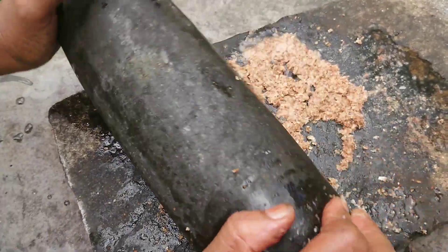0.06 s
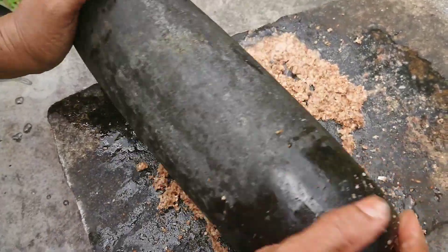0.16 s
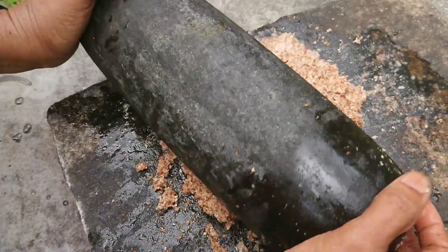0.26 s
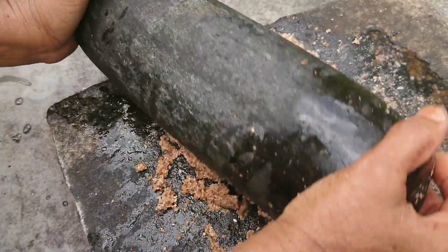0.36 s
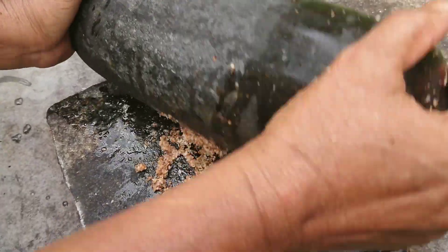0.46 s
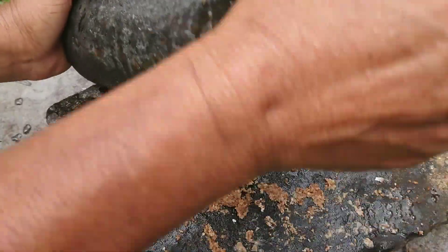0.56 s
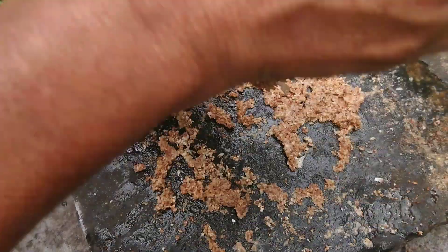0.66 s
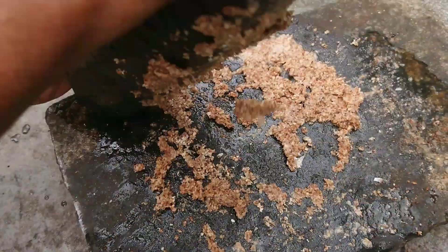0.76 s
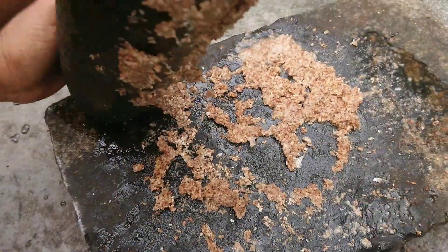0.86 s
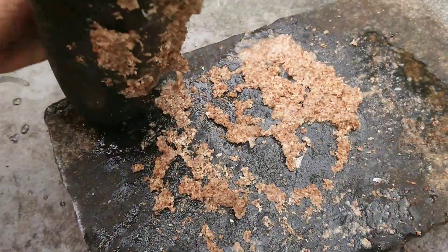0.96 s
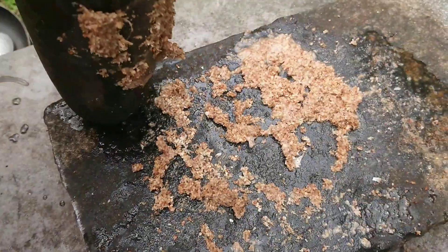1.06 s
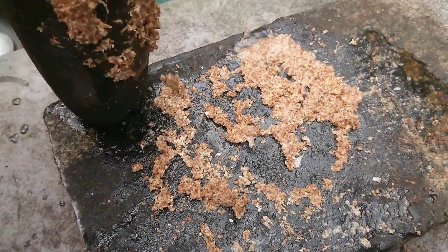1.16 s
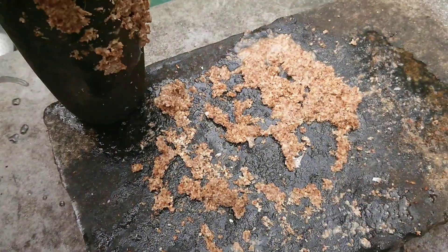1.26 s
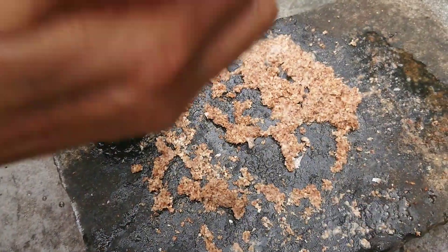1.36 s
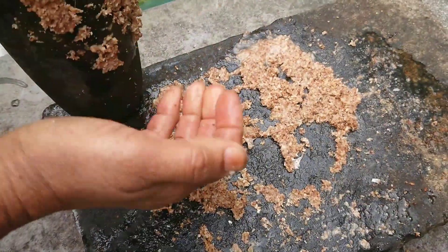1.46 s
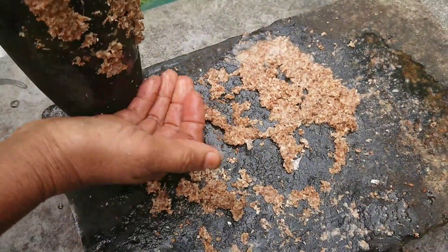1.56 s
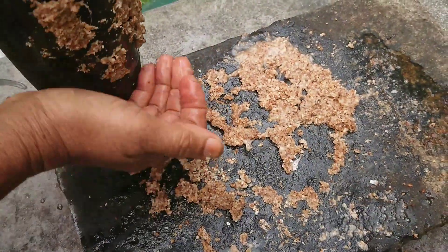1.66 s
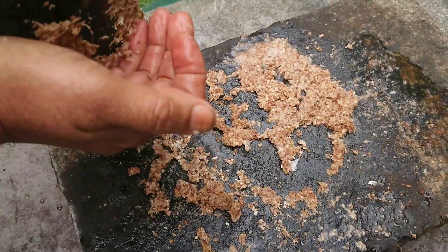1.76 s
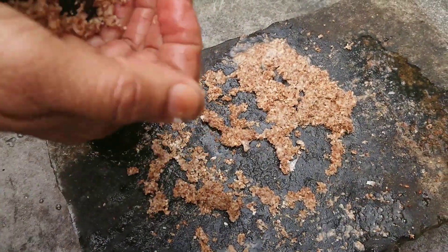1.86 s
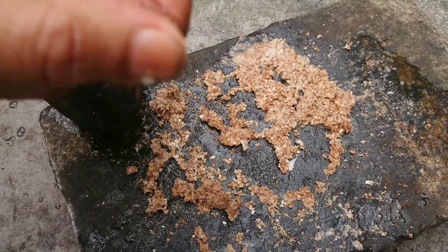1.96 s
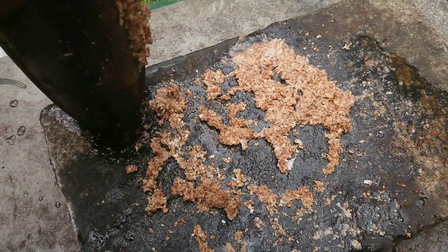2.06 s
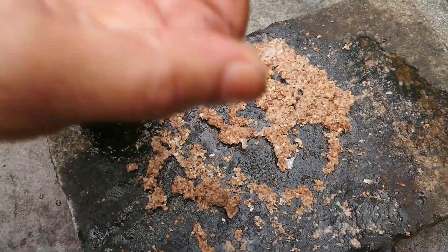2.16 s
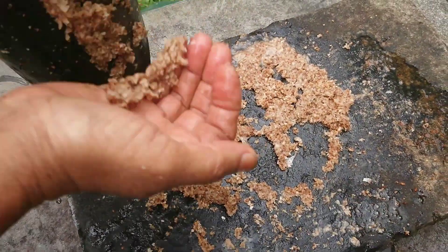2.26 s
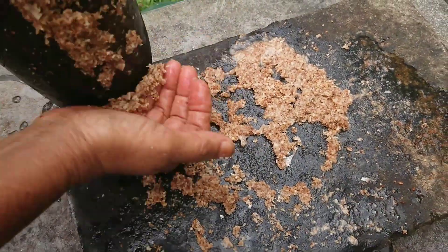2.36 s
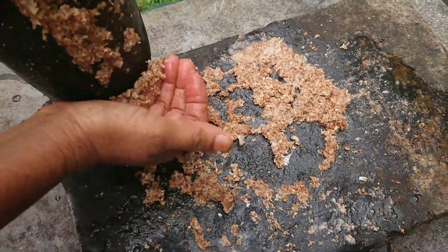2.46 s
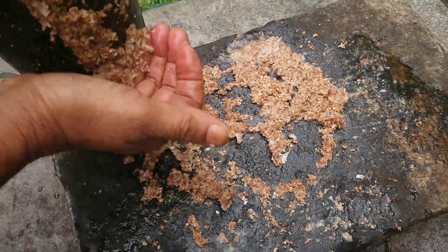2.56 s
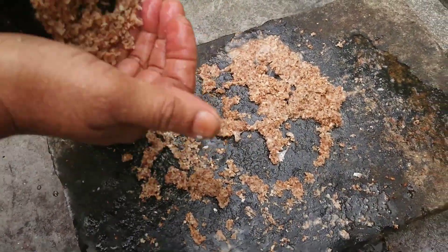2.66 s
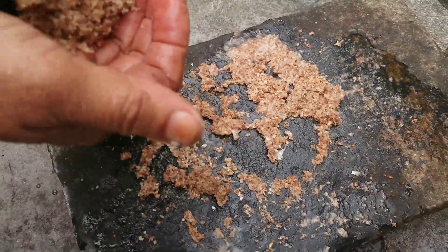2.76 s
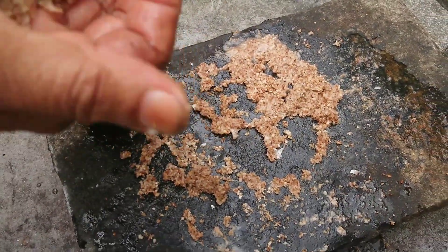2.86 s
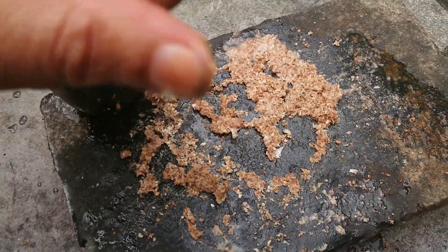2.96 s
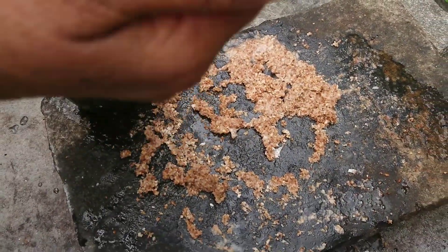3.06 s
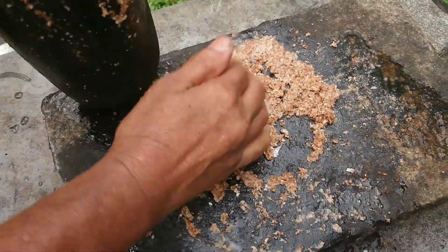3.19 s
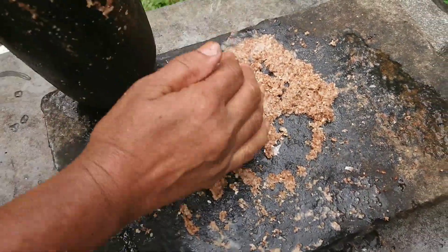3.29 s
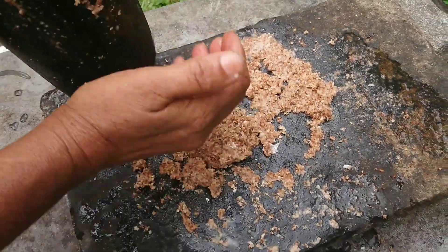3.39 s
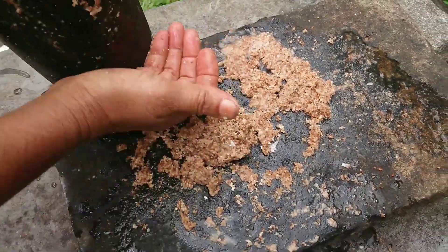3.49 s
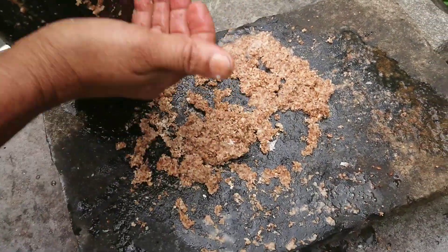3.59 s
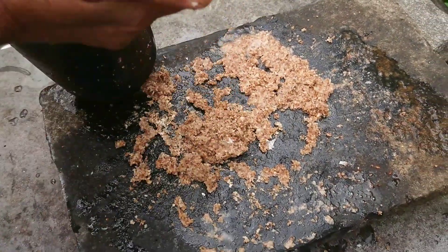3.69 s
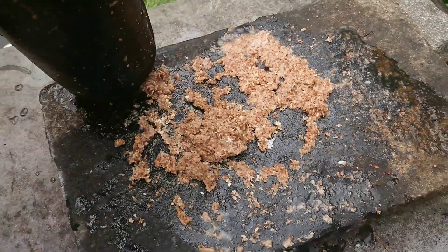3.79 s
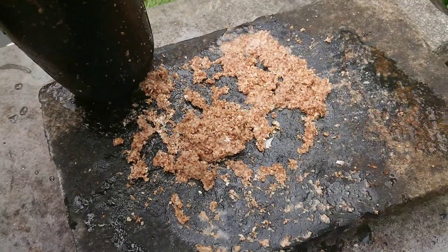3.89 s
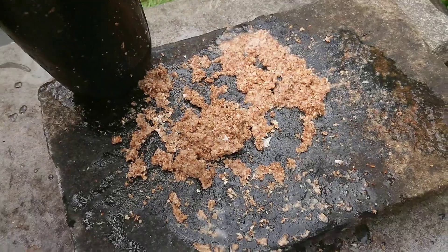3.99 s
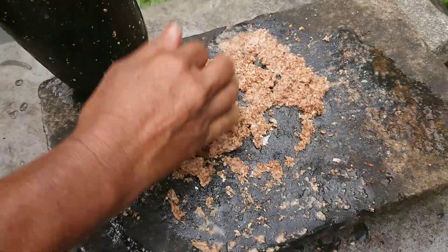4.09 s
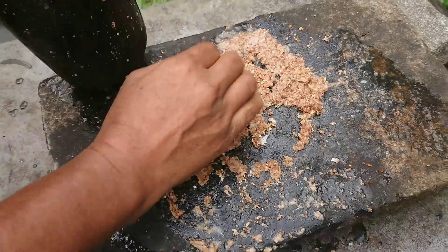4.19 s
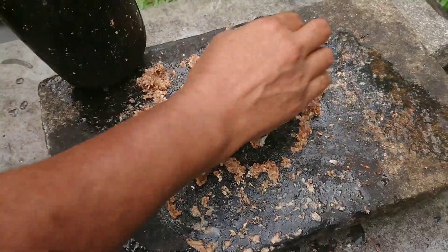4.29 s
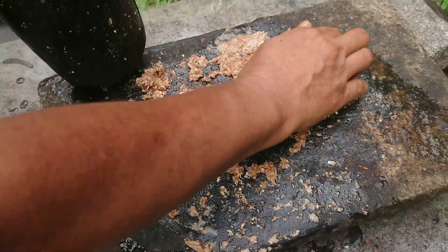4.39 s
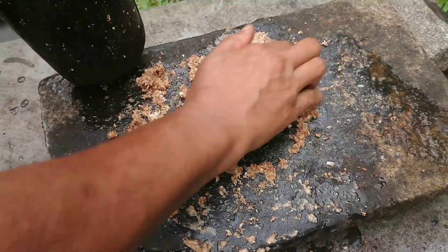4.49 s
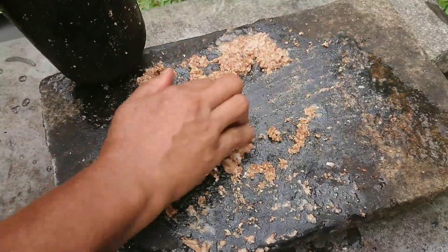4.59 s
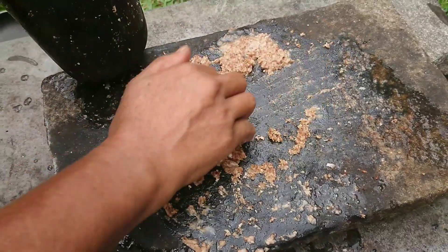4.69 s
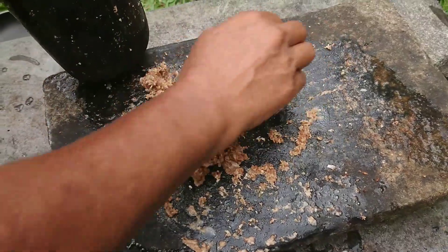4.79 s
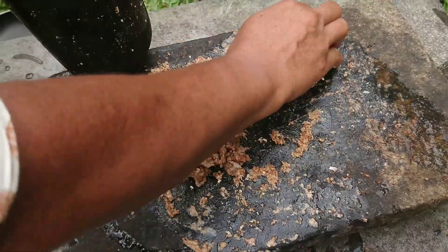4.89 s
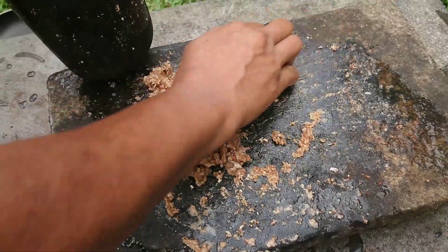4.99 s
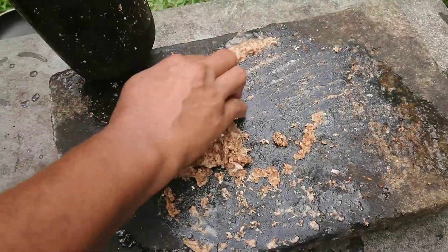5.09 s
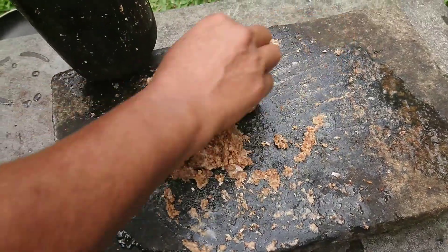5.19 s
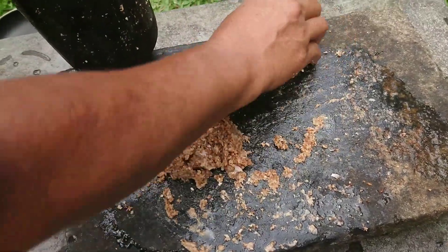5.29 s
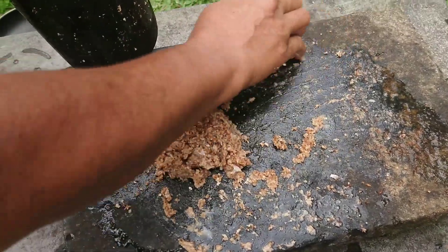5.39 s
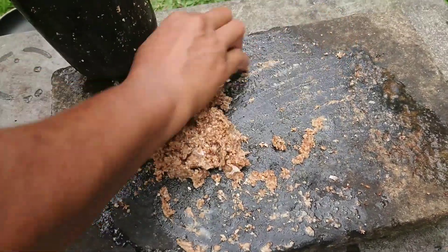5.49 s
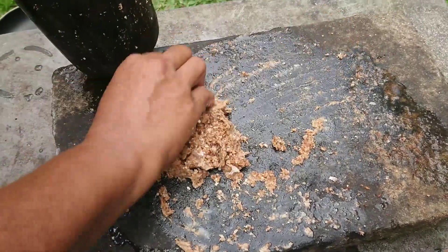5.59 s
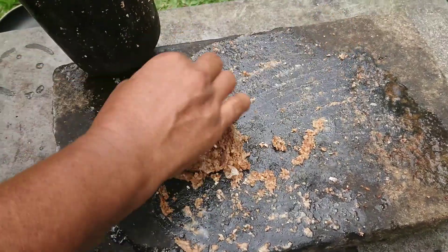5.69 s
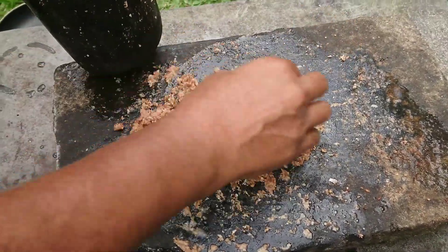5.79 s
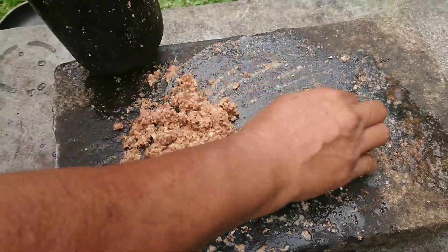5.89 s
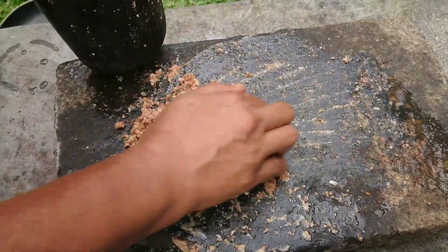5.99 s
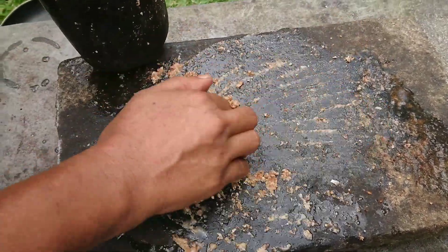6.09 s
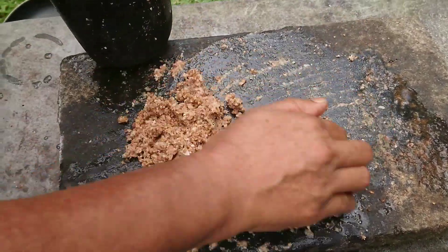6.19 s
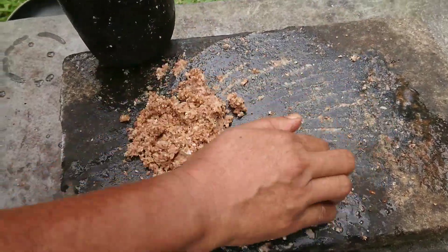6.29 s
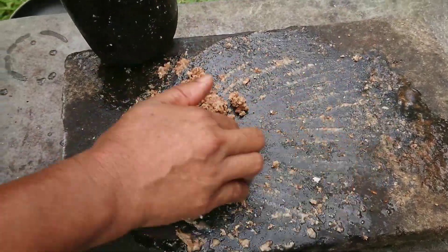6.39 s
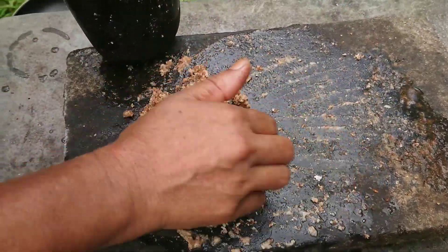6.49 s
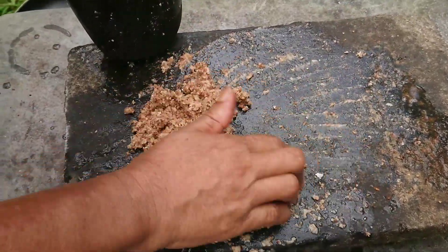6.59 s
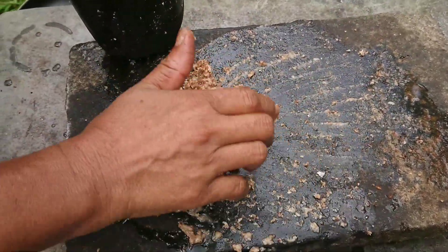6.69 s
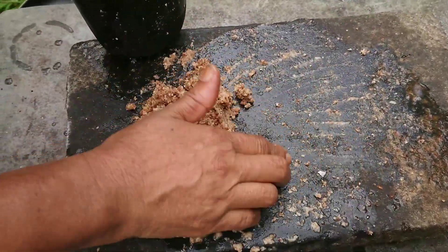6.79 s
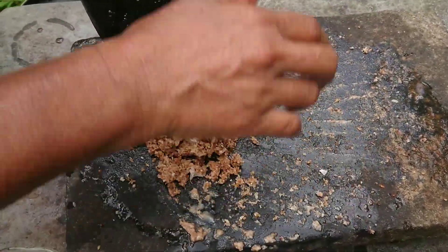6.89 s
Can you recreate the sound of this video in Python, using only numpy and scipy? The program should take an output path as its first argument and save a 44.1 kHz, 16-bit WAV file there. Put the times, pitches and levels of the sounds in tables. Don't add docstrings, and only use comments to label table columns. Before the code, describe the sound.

Outdoors, close to a wet stone slab, a stone roller turns on grit with a faint ring, knocks once, then is stood on end with a hard clack and quick bounces. A hand wipes wet grain off it in soft hisses and squelches, then sweeps the slab with raspier strokes. Low wind thumps buffet the microphone, stronger on the left, over a faint cicada chorus and a few far birds.

```python
import sys
import numpy as np
from scipy import signal
from scipy.fft import rfft, irfft, next_fast_len
from scipy.io import wavfile
from scipy.ndimage import uniform_filter1d

SR = 44100
rng = np.random.default_rng(int(sys.argv[2]) if len(sys.argv) > 2 else 0)


def to_linear_factor(level_db):
    exponent = np.asarray(level_db, float) / 20
    return 10 ** exponent


def store_pcm(level_fs):
    pcm = np.round(np.clip(level_fs, -1, 1) * 32767).astype(np.int16)
    wavfile.write(sys.argv[1], SR, np.atleast_2d(pcm).T)


N = 306435

# frequency in Hz, level in dB, 60 dB decay time in s.
ROLLER_MODES = [(3140, -24.5, 0.044), (4969, -24, 0.054), (5900, -27, .015)]


def noise():
    return rng.standard_normal(N)


def level(x, db):
    return x * to_linear_factor(db) / np.sqrt(np.mean(x ** 2))


def colour(x, points):
    hz, db = np.transpose(points)
    size = next_fast_len(N, real=True)
    f = np.arange(size // 2 + 1) * SR / size + 1
    gain = to_linear_factor(np.interp(np.log(f), np.log(hz), db))
    return irfft(rfft(x, size) * gain, size)[:N]


def band(x, hz, width):
    b, a = signal.iirpeak(hz, hz / width, fs=SR)
    return signal.lfilter(b, a, signal.lfilter(b, a, x))


def ring(x, modes):
    out = 0
    for hz, db, t60 in modes:
        pole = np.exp(2j * np.pi * hz / SR - np.log(1000) / (t60 * SR))
        out = out + to_linear_factor(db) * signal.lfilter([1], [1, -pole], x).imag
    return out


def walk(rate):
    k = int(SR / rate)
    steps = np.repeat(rng.standard_normal(N // k + 1), k)
    return 1.54 * uniform_filter1d(uniform_filter1d(steps, k), k)[:N]


def grit(spread_db):
    return noise() * to_linear_factor(spread_db * np.minimum(rng.exponential(size=N), 5))


def moving(x, hz, width):
    lowpass = signal.butter(2, width / 2, fs=SR, output="sos")
    slow = signal.sosfilt(lowpass, x * np.exp(2j * np.pi * rng.random(N)))
    carrier = np.exp(2j * np.pi * np.cumsum(hz) / SR)
    return level((slow * carrier).real, 0)


def spell(start, length, attack, release):
    t = np.arange(N) / SR - start
    attack, release = min(attack, length / 2), min(release, length / 2)
    gain = np.clip(np.minimum(t / attack, (length - t) / release), 0, 1)
    return np.sin(gain * np.pi / 2) ** 2, np.clip(t / length, 0, 1)


def add(out, s, x):
    i = int(s * SR)
    x = x[max(-i, 0):N - i]
    out[max(i, 0):max(i, 0) + len(x)] += x


def ports(x, left_db):
    lead = 11
    return np.array([x[0] * to_linear_factor(left_db / 2), np.roll(x[1], lead) * to_linear_factor(-left_db / 2)])


def air():
    # frequency in Hz, level in dB per Hz.
    air_tone = [(20, -54), (40, -10.5), (64, 2), (110, -8), (200, -16), (310, -23), (800, -23),
                (1600, -26.5), (3000, -26), (4500, -29), (5800, -33), (8500, -34), (10300, -32),
                (11500, -42.5), (15900, -69)]
    shared = colour(noise(), [(300, 2), (1200, -14)])
    own = [colour(noise(), [(60, -6.5), (250, -3.0), (1000, -2)]) for _ in range(2)]
    out = np.array([colour((shared + x) * to_linear_factor(1.0 * walk(2.916)), air_tone) for x in own])
    left_right_db = np.array([[1.5], [-1.5]])
    return level(out, -51) * to_linear_factor(left_right_db)


def birds():
    # start in seconds, length in seconds, start Hz, end Hz, level in dB, overtone in dB at 3/2.
    bird_notes = [
        (0.249, 0.064, 2000, 1984, -65, -40),
        (.66, 0.077, 1550, 1540, -71.5, -34),
        (1.124, 0.082, 1420, 1400, -67, -40),
        (6.105, 0.15, 1160, 1160, -63.5, -30),
        (6.41, 0.131, 1350, 1488, -74, -32),
        (6.631, 0.092, 1335, 1286, -61.5, -34),
        (6.663, .16, 1217, 1184, -57.5, -15),
    ]
    out, waver, hoarse = np.zeros(N), walk(50), to_linear_factor(2.0 * walk(90))
    for s, length, hz0, hz1, db, over_db in bird_notes:
        u = np.linspace(0, 1, int(length * SR))
        hz = hz0 + (hz1 - hz0) * u + 8 * waver[int(s * SR):][:len(u)]
        phase = 2 * np.pi * np.cumsum(hz) / SR
        whistle = np.sin(phase) + to_linear_factor(over_db) * np.sin(3 * phase / 2)
        add(out, s, to_linear_factor(db) * np.sin(np.pi * u) ** .5 * whistle)
    t = np.arange(8000) / SR
    trees = [to_linear_factor(-36) * rng.standard_normal(len(t)) * np.exp(-t / 0.059) for _ in range(2)]
    return np.array([out * hoarse + signal.fftconvolve(out, tail)[:N] for tail in trees])


def cicadas():
    chorus_hz = (7140, 7060)
    # frequency in Hz, level in dB.
    chorus_overtones = [(12700, -85), (14500, -86)]
    # time in seconds, pitch in Hz, level in dB.
    near_cicada = [
        (3.74, 3150, -82),
        (3.79, 3080, -67.5),
        (4.599, 3026, -66),
        (5.3, 2907, -66.5),
        (6.05, 2780, -67.5),
        (6.3, 2800, -78),
    ]
    chorus = []
    for hz in chorus_hz:
        blur = level(band(band(grit(.8), hz, 1960), hz, 1960), -56) * to_linear_factor(1.02 * walk(3.37))
        chorus.append(blur + sum(level(band(noise(), top_hz, 800), db) for top_hz, db in chorus_overtones))
    s, hz, db = np.transpose(near_cicada)
    t = np.arange(N) / SR
    loud = to_linear_factor(np.interp(t, s, db, left=-120, right=-120) + 1.2 * walk(20))
    near = [loud * moving(grit(2.09), np.interp(t, s, hz), 300) for _ in range(2)]
    return np.array(chorus) + near


def shed(offset_db):
    # time in seconds, peak level in dB.
    breeze = [(0, -37), (.5, -34.5), (.68, -31), (.85, -48), (1.6, -48), (1.8, -40), (2.1, -29.5),
              (2.25, -51), (2.6, -34), (2.78, -44), (3.1, -39.5), (3.3, -33.5), (3.65, -29), (3.82, -34.5),
              (3.9, -50), (5.75, -57), (5.9, -41), (6.4, -48)]
    gap_s, scatter_db = .036, 3
    chance = rng.standard_normal((int(N / SR / gap_s), 4)).T
    s = np.clip((np.arange(chance.shape[1]) + .5 + 0.248 * chance[0]) * gap_s, 0, None)
    db = np.interp(s, *np.transpose(breeze)) + offset_db + scatter_db * chance[1]
    swing_hz = 76.5 * np.exp(.15 * chance[2])
    length_ms = 15 * np.exp(0.47 * chance[3])
    return list(zip(s, db, swing_hz, length_ms))


def wind():
    # time in seconds, peak in dB, swing in Hz, length in ms.
    left_eddies = [(0.005, -13, 117, 3.3), (0.056, -22.5, 71.5, 10), (0.12, -26, 145, 2.4),
                   (0.24, -25.5, 111, 3.9), (0.266, -20.5, 80, 4.2), (0.308, -19.5, 72, 49),
                   (0.362, -9.5, 77.6, 8.8), (0.754, -23, 72.6, 11), (0.94, -20, 75, 29),
                   (0.984, -14.5, 133, 20.6), (1.072, -29.5, 60.6, 48), (1.182, -26.5, 73, 15),
                   (1.311, -28.5, 101.5, 6.9), (1.681, -19, 98.6, 14), (1.709, -22.5, 77, 15),
                   (1.74, -25.5, 104, 16), (1.766, -18.5, 79.5, 4.8), (1.896, -31, 82.5, 24),
                   (1.969, -13, 109, 6.7), (2.36, -32, 82, 26), (2.888, -26, 82.6, 13.3),
                   (2.912, -26, 80, 11.6), (3.449, -16, 91, 17), (3.517, -27.5, 117, 9.9),
                   (3.554, -25, 89.6, 11), (3.585, -22.5, 102, 13.5), (3.742, -25.5, 100.3, 15),
                   (6.116, -29, 74, 15), (6.159, -30, 65.7, 16), (6.23, -26, 92, 9.7)]
    right_eddies = [
        (0.124, -36, 137, 2),
        (0.283, -23, 91, 3),
        (0.408, -32, 115, 14),
        (0.528, -29.5, 154, 13),
        (2.541, -35, 59, 31),
        (2.598, -30, 69, 23),
        (3.073, -29.5, 73, 2),
        (3.138, -38, 69, 29),
        (3.189, -37, 66, 13),
    ]
    out = np.zeros((2, N))
    lee_db = -20
    for port, eddies in zip(out, (left_eddies + shed(0), right_eddies + shed(lee_db))):
        for (s, db, hz, ms), turns in zip(eddies, rng.random((len(eddies), 3))):
            sigma = max(ms / 1000, .5 / hz) / 2.16
            t = np.arange(-6 * sigma, 6 * sigma, 1 / SR)
            # pitch ratio, width in s, level in dB
            parts = ((.65, 2.1 * sigma, -5), (1.1, 0.82 * sigma, -3), (2.4, .0022, -14))
            for (ratio, width, part_db), turn in zip(parts, turns):
                swing = np.exp(-.5 * (t / width) ** 2) * np.cos(2 * np.pi * (ratio * hz * t + turn))
                add(port, s + t[0], to_linear_factor(db + part_db) * swing)
    return signal.sosfilt(signal.butter(4, 42, "high", fs=SR, output="sos"), out)


def taps():
    # time in seconds, level in dB, frequency in Hz, length in ms.
    fingertips = [
        (2.04, -48, 470, 3.5),
        (4.09, -47, 215, 9),
        (6.62, -53, 750, 2.2),
        (6.8272, -38, 770, 0.95),
        (6.8303, -30, 1750, .4),
        (6.8332, -39.5, 583, 1.66),
    ]
    out = np.zeros(N)
    for s, db, hz, ms in fingertips:
        t = np.arange(-ms / 250, ms / 250, 1 / SR)
        add(out, s + t[0], to_linear_factor(db) * np.exp(-.5 * (1000 * t / ms) ** 2) * np.sin(2 * np.pi * hz * t))
    return ports([out, out], 2.3)


def strokes():
    # start in seconds, length in seconds, rub level in dB,
    # cupped palm in dB above it, swell over the stroke in dB.
    wipes = [
        (.06, 0.091, -56.5, 7, .1),
        (.16, .13, -63.5, -8, .1),
        (.96, .09, -64, -15, .1),
        (1.23, 0.29, -72, -2.5, .1),
        (1.69, .38, -58.5, -.5, -2.5),
        (2.53, .46, -64, 1.5, 6.5),
        (3.56, .33, -63, 1.5, -4),
    ]
    sweeps = [
        (4.47, 0.28, -63, 6, .1),
        (4.98, .23, -69.5, 13, .1),
        (5.42, .3, -72, 16, 5),
        (5.98, .14, -63, -9, -2.5),
        (6.3, 0.21, -71, 10.5, 2.5),
    ]
    # attack in s, release in s, palm in Hz, palm change in dB, palm glide ratio,
    # rasp in dB at start and at end, rasp in Hz.
    wipe_rule = (0.03, 0.12, 1470, -8.5, 1.4, -6, 12.5, 4550)
    sweep_rule = (2, 0.7, 1780, -10.5, 1.1, 13, 6.5, 2900)
    crumble_db, crumble_s = -12.5, .16
    rub, shape = np.zeros(N), np.ones((4, N))
    for table, rule in ((wipes, wipe_rule), (sweeps, sweep_rule)):
        attack, release, palm_hz, open_db, glide, rasp0_db, rasp1_db, rasp_hz = rule
        for start, length, db, palm_db, swell_db in table:
            gain, u = spell(start, length, attack, release)
            slip, _ = spell(start + length / 2, length / 2 + crumble_s, attack, crumble_s)
            rub = rub + to_linear_factor(db + swell_db * u) * np.maximum(gain, to_linear_factor(crumble_db) * slip)
            rasp_db = (rasp0_db + (rasp1_db - rasp0_db) * u) * (gain > 0)
            now = [palm_db + open_db * u, palm_hz * glide ** u, rasp_db, rasp_hz + 0 * u]
            shape = np.where(gain + slip > 0, now, shape)
    return rub, shape


def hand():
    # frequency in Hz, level in dB per Hz.
    rub_tone = [(500, -25), (1500, -3.5), (6000, 2), (8500, 3.5), (11500, 0.5), (13000, -2), (15900, -5.5)]
    # time in seconds, level in dB, length in ms, centre in Hz.
    smacks = [(.092, -33, 3, 6100), (0.11, -38, 8, 7100), (.118, -36, 8, 7200), (.126, -35, 4.96, 3200),
              (3.262, -41, 3, 3200), (3.267, -39, 7.15, 2900), (3.065, -51, 2.97, 5940),
              (3.39, -54, 3, 7600), (4.6, -44, 4, 3200), (6.62, -51, 4, 7400), (6.83, -49, 2.2, 7200),
              (3.266, -43, 5, 1170), (6, -46, 1.52, 2000), (3.267, -40, 4.7, 8000), (0.085, -29, 9.5, 560),
              (0.11, -28.5, 9.8, 600), (1.309, -37, 14.4, 630)]
    squeezes = [
        (1.28, -47, 41, 4550),
        (1.28, -49, 35, 2450),
        (1.735, -42, 45, 1480),
        (2.02, -47, 45, 4900),
        (2.91, -46, 45, 4250),
    ]
    rub, (palm_db, palm_hz, rasp_db, rasp_hz) = strokes()
    out = []
    for _ in range(2):
        fine = grit(1.1)
        patchy = rub * to_linear_factor(1.3 * walk(25))
        hiss = level(colour(fine, rub_tone), 6.3)
        palm = to_linear_factor(palm_db - 1.0) * moving(grit(0.77), palm_hz, 970)
        rasp = to_linear_factor(rasp_db - 6.5) * moving(grit(1.2), rasp_hz, 1800)
        out.append(patchy * (hiss + palm + rasp))
        for s, db, ms, hz in smacks + squeezes:
            u = np.arange(int(ms * SR / 250)) / (ms * SR / 1000)
            burst = rng.standard_normal(len(u)) * u * np.exp(-2 * u) * 5
            width = hz / (.5 + ms / 10)
            add(out[-1], s - ms / 4000, to_linear_factor(db + 2.5) * band(burst, hz, width))
    return ports(out, 3.5)


def rolling():
    # start in seconds, length in seconds, slab rumble in dB, first and second roller ring in dB.
    turns = [
        (0, .06, -61, -67, -80),
        (0.074, .1, -61, -62, -74),
        (.18, 0.24, -85, -65, -82),
        (.435, .18, -49, -65, -64),
        (0.627, 0.14, -85, -71, -90),
    ]
    # frequency in Hz, level in dB, 60 dB decay time in s.
    rumble = (474, 0, 0.035)
    edge_s, settle_db_per_s, beading_db = .025, -41, 3.5
    out, grains = 0, grit(1.5)
    for column, mode in enumerate((rumble, ROLLER_MODES[0], (4969, 0, .07))):
        loud = 0
        for start, length, *db in turns:
            gain, progress = spell(start - edge_s / 2, length + edge_s, edge_s, edge_s)
            settle_db = (column == 0) * settle_db_per_s * length * progress
            loud = loud + gain * to_linear_factor(db[column] + settle_db)
        out = out + loud * to_linear_factor(beading_db * walk(70.3)) * level(ring(grains, [mode]), 0)
    return ports([out, out], 2.6)


def knocks():
    # time in seconds, blow in dB, contact in ms, roller ring in dB.
    contacts = [(0.3681, -16.5, 0.6, 9), (0.3729, -20, 0.62, -23), (0.8316, -15, 0.34, -14),
                (0.8326, -5.5, 0.43, 4.5), (.8660, -10, 0.47, -2.5), (0.8802, -19, 0.59, 10),
                (.447, -50, 1.2, -3), (0.471, -51, 0.83, 0), (0.514, -46, 1.63, -9), (0.539, -47, 0.57, 3),
                (.560, -42.5, 1.04, -8), (0.572, -45, 0.62, 7), (0.595, -49, 0.72, 4)]
    # frequency in Hz, level in dB, 60 dB decay in s.
    slab_modes = [(370, -0.5, 0.04), (441, -3, 0.058), (490, 0.5, 0.022), (660, -0.5, 0.012),
                  (837, -1.5, 0.011), (1257, -5.5, 0.017), (1510, -2, 0.012), (2380, 7.5, 0.0048),
                  (1920, -7, 0.0057)]
    push, ringing = np.zeros(N), np.zeros(N)
    for s, db, ms, ring_db in contacts:
        u = np.arange(-4, 4, 4000 / (ms * SR))
        pulse = to_linear_factor(db) * u * np.exp(-u ** 2 / 2)
        add(push, s, pulse)
        add(ringing, s, to_linear_factor(ring_db) * pulse)
    t = np.arange(2000) / SR
    shared = rng.standard_normal(len(t))
    body = 0.75 * push + to_linear_factor(-21.5) * ring(push, slab_modes[4:])
    out = []
    for _ in range(2):
        scatter = to_linear_factor(-30) * (shared + .5 * rng.standard_normal(len(t))) * np.exp(-t / .006)
        rattle = signal.fftconvolve(body, scatter)[:N]
        out.append(body + rattle + to_linear_factor(-6.5) * ring(ringing, ROLLER_MODES))
    whole = to_linear_factor(-24) * ring(push, slab_modes[:4])
    both = ports(out, 8) + ports([whole, np.roll(whole, -7)], 4.3)
    return signal.sosfilt(signal.butter(2, 280, "high", fs=SR, output="sos"), both)


def scene():
    return knocks() + rolling() + hand() + taps() + wind() + cicadas() + birds() + air()


def low_pass(x):
    return signal.sosfilt(signal.butter(12, 16020, fs=SR, output="sos"), x)


def record(dry):
    # frequency in Hz, gain in dB.
    right_port = [(300, -2.5), (1500, 4), (5000, 3), (9000, -1), (10500, -4), (11500, -25), (12500, -0.5),
                  (15000, -4)]
    heard = np.array([dry[0], colour(dry[1], right_port)])
    heard = .85 * np.tanh(heard / .85)
    heard = signal.sosfilt(signal.ellip(8, .2, 60, 15800, fs=SR, output="sos"), heard)
    return low_pass(heard)


dry = scene()
out = record(dry)
store_pcm(out)
```